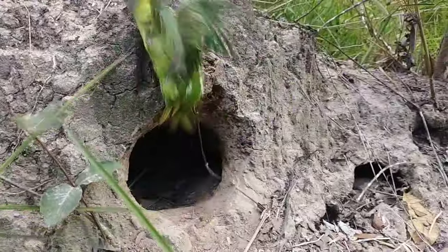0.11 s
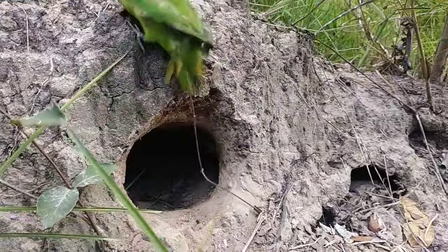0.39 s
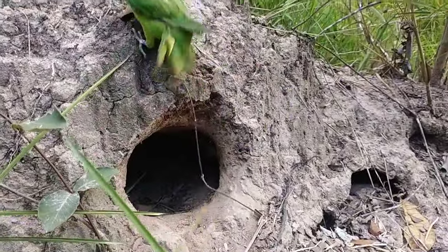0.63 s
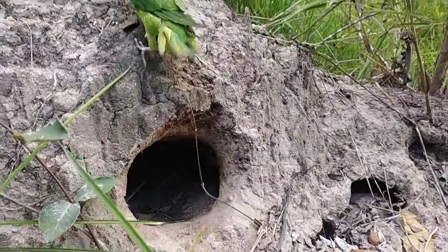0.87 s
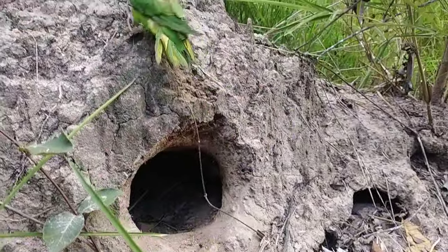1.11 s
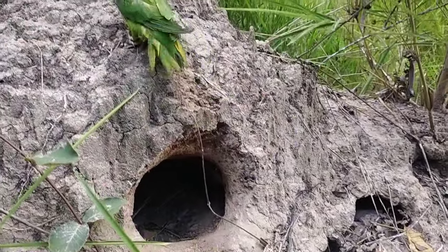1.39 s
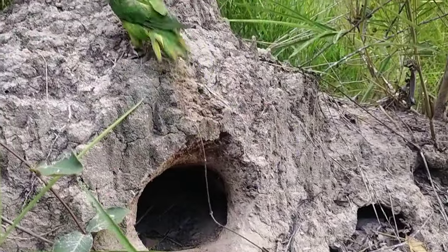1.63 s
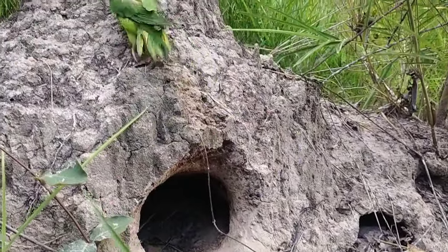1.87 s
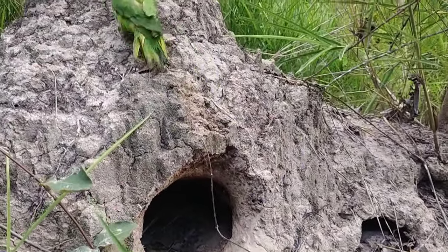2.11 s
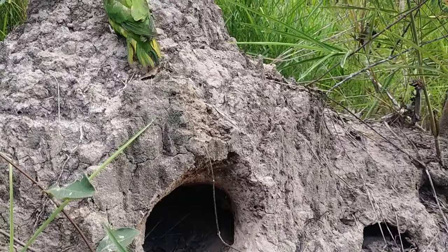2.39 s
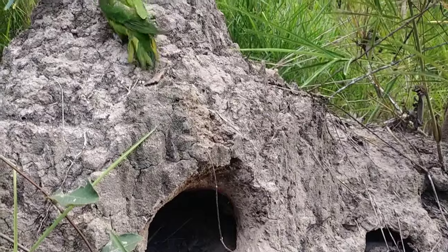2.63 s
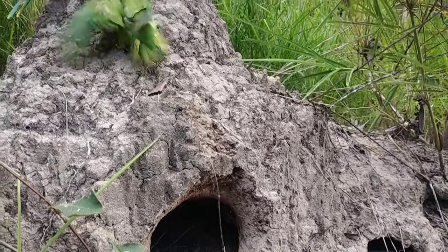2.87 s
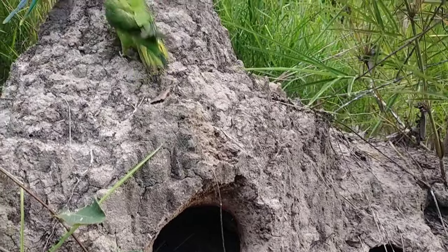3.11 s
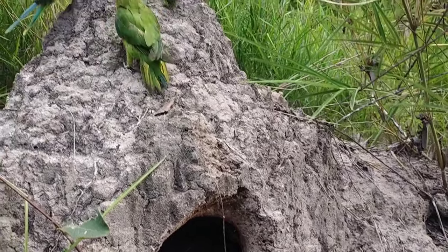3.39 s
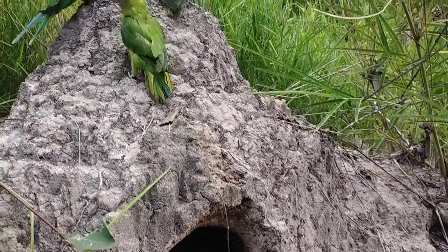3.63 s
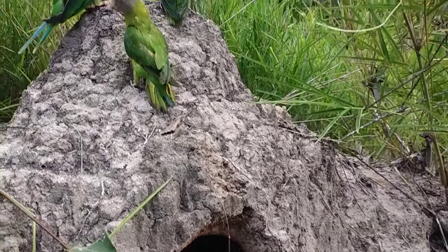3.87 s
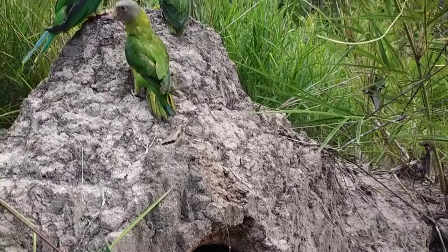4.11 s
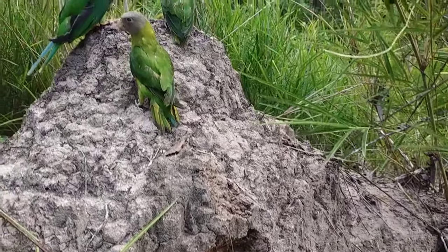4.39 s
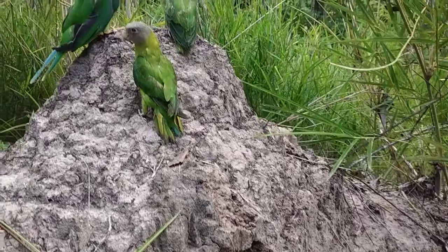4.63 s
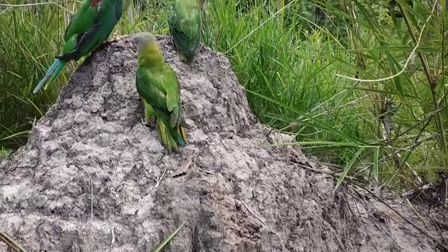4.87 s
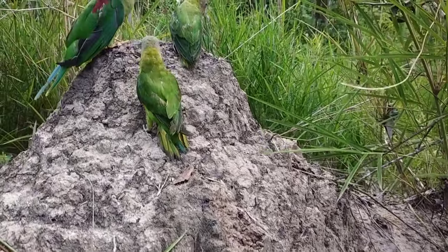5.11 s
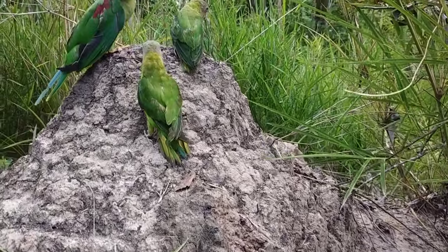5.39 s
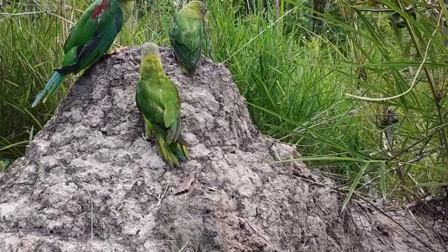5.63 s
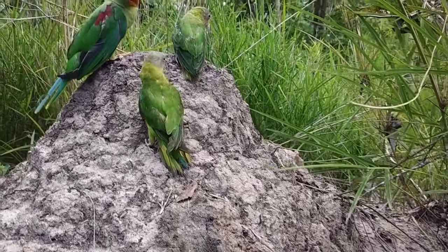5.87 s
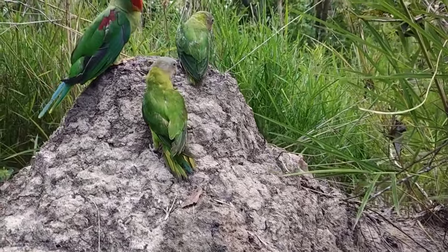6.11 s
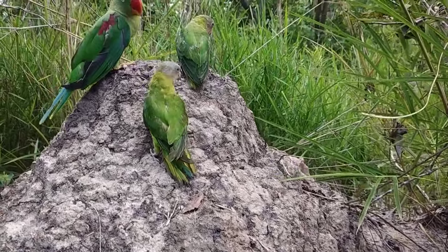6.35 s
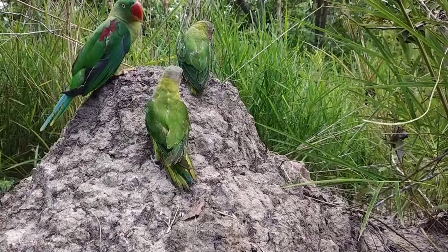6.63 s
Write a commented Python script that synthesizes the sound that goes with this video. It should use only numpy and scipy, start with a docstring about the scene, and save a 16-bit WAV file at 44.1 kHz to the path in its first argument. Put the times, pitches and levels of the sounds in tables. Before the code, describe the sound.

Outdoors, close to a phone microphone, a dense flurry of wing claps bursts out from 0 to 0.3 seconds: hard, feathery slaps with bright hiss and low puffs of air. Rustling grit lingers. From about 0.65 to 2 seconds claws tick and scrape on dry crust, with a strong hollow knock near 1.33 and lesser ones near 1.7. A distant dove coos softly at 1.0 and 1.2, then rolls in a quickening, falling throb from 1.5, with a faint coo at 2.2. Light ticks continue until a smaller, crisp flutter at 3.55 to 3.8. Afterwards only sparse faint scratches remain over low hum, hiss, crickets chirping four or five times a second and a thin high whine. Tiny abrupt dropouts interrupt the sound, mostly from 2.7 to 5.5. The dove coos again around 5.8 and 6.0, and another throbbing roll begins near 6.35, running to the end.

```python
"""Parrots on an earth mound

Small parrots flap up an earth mound and scrabble over its dry crust, close to a phone: short bursts
ring damped resonances, amid rustling grains and low wing air. A dove, a gliding near sine, coos
further off; crickets, noise pulses through a wing resonance, chirp and whine over a low outdoor hum
of filtered noise. Now and then the whole sound cuts out for an instant."""
import sys
import numpy as np
from scipy import signal
from scipy.fft import rfft, irfft
from scipy.io import wavfile
from scipy.ndimage import uniform_filter1d

SR = 44100
rng = np.random.default_rng(int(sys.argv[2]) if len(sys.argv) > 2 else 0)


def natural_amplitude(level_db):
    """Convert a level in decibels to a linear amplitude factor, elementwise."""
    exponent = np.asarray(level_db, float) / 20
    return 10 ** exponent


def pcm_store(signal):
    """Save signal as 16-bit PCM."""
    levels = np.round(np.clip(np.atleast_2d(signal), -1, 1) * 32767)
    wavfile.write(sys.argv[1], SR, levels.astype(np.int16).T)


N = 297234

# wing claps: (time [s], thump peak [dB], feather swish peak [dB], top hiss peak [dB], thump pitch [Hz])
WING_CLAPS = [(.001, -25.5, -28, -28, 1220), (.031, -20.5, -21, -24, 865), (.066, -20, -21.5, -17, 1940),
              (.072, -18, -26, -16, 1260), (0.113, -7, -10.5, -10, 1130), (.138, -34, -26, -38, 1900),
              (.149, -8.5, -17.5, -14, 970), (.153, -16, -18.5, -13, 1900), (0.181, -28.5, -41, -45, 480),
              (.194, -33, -28, -24, 1860), (.234, -37, -44, -31, 3400), (.252, -13.5, -7.5, -11.5, 2680),
              (.264, -26, -18, -32, 1960), (0.279, -34, -31, -42, 1990), (0.289, -17.5, -20.5, -33, 2190),
              (3.557, -49, -45, -42, 1610), (3.594, -41, -35, -42, 2800), (3.605, -33, -29, -27, 2870),
              (3.6221, -25, -22, -31, 540), (3.625, -21, -23, -12.5, 3160), (3.639, -29.5, -35, -34, 560),
              (3.644, -41, -27, -26, 1490), (3.66, -33, -47, -34, 3160), (3.682, -56, -38, -28, 2670),
              (3.688, -53, -39, -26, 1840), (3.697, -52, -37, -32, 3100), (3.712, -40, -42, -38, 2470),
              (3.735, -45, -39, -40, 2350), (3.771, -38.5, -42, -31, 2520), (3.787, -38.5, -41, -36, 637)]
# claws, beak and tail on the crust: (time [s], thump peak [dB], swish peak [dB], top hiss peak [dB],
# thump pitch [Hz])
CRUST_BLOWS = [(.6532, -37, -47, -42, 1190), (.8937, -30.5, -45, -54, 1180), (.952, -44, -39.5, -36, 2120),
               (1.1173, -30, -40, -36, 1590), (1.13, -53, -50, -28, 1680), (1.1702, -32, -47, -51, 1610),
               (1.255, -21.5, -36, -43, 1600), (1.271, -23.5, -48, -51, 1400), (1.284, -25, -55, -52, 1670),
               (1.2914, -37, -51, -46, 1850), (1.3273, -6.5, -32, -49, 1480),
               (1.3708, -35.5, -54, -52, 1450), (1.5008, -36, -30.5, -31, 1690),
               (1.5144, -38, -32, -45, 1870), (1.544, -36, -36, -36, 1880), (1.5652, -41, -27, -40, 2150),
               (1.5804, -53, -26.5, -42, 2940), (1.5934, -56, -54, -35, 1710),
               (1.6871, -17, -30, -24, 1570), (1.7203, -34, -58, -37, 2480),
               (1.7666, -16.5, -35, -29, 2070), (1.8467, -35.5, -33, -32, 1300),
               (1.8502, -33.5, -30.5, -42, 2320), (1.9547, -47, -41, -27, 3200),
               (1.992, -56, -55, -36, 2740), (2.5182, -31.5, -44, -42, 2280),
               (2.7884, -41.5, -61, -59, 1750), (2.843, -42, -60, -58, 1800), (2.8865, -39, -42, -57, 1390),
               (2.8956, -39, -57, -57, 2030), (2.9342, -42, -61, -55, 1890), (2.9582, -41, -61, -55, 2190),
               (2.9906, -43, -61, -52, 2070), (3.246, -58, -42, -42, 3040), (3.4945, -42, -49, -51, 2280),
               (3.864, -45, -63.5, -40, 2510), (4.2095, -44, -60, -52, 1580), (4.2204, -52, -54, -47, 2270),
               (4.288, -44, -49, -38, 2060), (4.3301, -43, -45, -38, 3150), (4.5434, -51, -52, -35, 1510),
               (4.5511, -46, -53, -32, 1280), (4.578, -38.5, -44, -39, 2500), (6.4434, -43, -61, -56, 1720)]


def evened(x):
    """Normalisation by energy: scales a signal to rms 1."""
    return x / np.sqrt(np.mean(x ** 2) + 1e-20)


def curve(rows, column=1):
    """Linear interpolation: one column of a table at every sample."""
    rows = np.array(rows)
    return np.interp(np.arange(N) / SR, rows[:, 0], rows[:, column])


def shape(x, points):
    """Linear filtering: multiplies the spectrum by a (frequency [Hz], gain [dB]) curve."""
    hz, db = np.transpose(points)
    f = np.fft.rfftfreq(len(x), 1 / SR)
    gain_db = np.interp(np.log(f + 1), np.log(hz), db)
    return irfft(rfft(x) * natural_amplitude(gain_db), len(x))


def coloured(x, points):
    """Spectral colouring: filters a signal and brings it to rms 1."""
    return evened(shape(x, points))


def resonate(x, hz, width):
    """Damped resonance: a pole pair whose radius sets the bandwidth [Hz]."""
    r = np.exp(-np.pi * width / SR)
    return signal.lfilter([1, 0, -1], [1, -2 * r * np.cos(2 * np.pi * hz / SR), r * r], x)


def add(mix, s, sound):
    """Superposition: adds a sound to the mix at s seconds."""
    part = mix[max(round(s * SR), 0):][:len(sound)]
    part += sound[:len(part)]


def wander(seconds):
    """Random fluctuation: noise averaged over a time span, at rms 1."""
    return evened(uniform_filter1d(rng.standard_normal(N), max(round(seconds * SR), 2)))


def bed():
    """Stationary noise: outdoor hum and hiss of fixed colour whose level drifts a little."""
    # spectrum of hum and hiss: (frequency [Hz], relative level [dB])
    hum_spectrum = [(30, -35), (70, -20.5), (110, -0.5), (145, 2), (200, -6.5), (300, -13.5), (600, -21.5),
                    (1500, -26), (3400, -31.5), (4200, -31), (6000, -38.5), (9000, -40), (12000, -34.5),
                    (14500, -31), (16000, -28.5)]
    level = natural_amplitude(-47.5 + 1. * wander(0.13))
    return level * coloured(rng.standard_normal(N), hum_spectrum)


def crickets():
    """Stridulation: uneven file strokes ring a wing near 4.8 kHz; far insects blur into a whine."""
    # chirps, about 4.7 a second; a second singer falls between them from 4.5 s:
    # (middle [s], level [dB], length [s])
    chirp_rows = [(0.106, -57, .073), (.337, -60, 0.07), (.523, -51, .048), (.763, -60, .067),
                  (.94, -60, 0.11), (1.012, -59, .064), (1.23, -57, 0.088), (1.42, -57, 0.1),
                  (1.62, -57, 0.12), (1.828, -53, .085), (2.022, -57, .11), (2.23, -54, 0.071),
                  (2.45, -52.5, .056), (2.678, -50.5, .078), (2.885, -56.5, .08), (3.108, -52.5, 0.069),
                  (3.297, -49, 0.046), (3.505, -51, 0.057), (3.712, -56, .14), (3.93, -52.5, 0.071),
                  (4.148, -54.5, 0.059), (4.324, -54, 0.074), (4.495, -61, 0.11), (4.554, -55.5, .057),
                  (4.65, -56.5, 0.053), (4.733, -60, 0.067), (4.826, -56, .047), (4.955, -57, .043),
                  (5.036, -53.5, 0.041), (5.15, -54.5, .043), (5.229, -52, .028), (5.398, -55.5, 0.049),
                  (5.575, -51, .047), (5.79, -56.5, 0.12), (5.929, -57, .033), (6.02, -59, 0.074),
                  (6.21, -56.5, 0.11), (6.435, -55, .1), (6.658, -54, 0.077)]
    # wing resonance: (frequency [Hz], gain [dB])
    wing_spectrum = [(4000, -27), (4450, -4.5), (4750, 6), (5050, 2), (5300, -12.5), (5900, -22)]
    # steady far insects: (frequency [Hz], bandwidth [Hz], level [dB])
    whine_rows = [(7720, 170, -69), (8040, 86, -65)]
    t = np.arange(N) / SR
    swell = np.full(N, natural_amplitude(-62.5))  # far chirps merge under the near ones
    for s, db, length in chirp_rows:
        swell += natural_amplitude(db) * np.exp(-abs((t - s) / (0.51 * length)) ** 3)
    struck = rng.random(N) < 5000 / SR  # 5000 strokes a second on average
    strokes = rng.standard_normal(N) * natural_amplitude(1.8 * wander(0.0026)) * struck
    out = swell * coloured(strokes, wing_spectrum)
    for hz, width, db in whine_rows:
        whine = resonate(resonate(rng.standard_normal(N), hz, width), hz, 3 * width)
        out += natural_amplitude(db + 3.1 * wander(0.046)) * evened(whine)
    return out


def held_coos():
    """Frequency modulation: near-sine notes arch in pitch, swell, drop in loudness and fade."""
    # held coos: (start [s], length [s], level while held [dB], top pitch [Hz],
    # place of the loudness drop [share of length])
    coo_rows = [(0.966, 0.047, -54, 707, 0.57), (1.165, 0.21, -39.5, 828.5, 0.64),
                (2.174, 0.16, -51, 698, 0.68), (5.798, 0.037, -51.5, 716, 0.7),
                (5.991, 0.22, -38, 835, 0.59)]
    longest_rise_s, swell_to = 0.0702, 0.23  # swell_to is a share of the length
    out = np.zeros(N)
    for s, length, db, top_hz, drop_at in coo_rows:
        u = np.linspace(0, 1, round(length * SR))
        top_at = min(longest_rise_s / length, .5)
        bend = 0.153 * np.maximum(1 - u / top_at, 0) ** 2
        bend += 0.207 * np.maximum((u - top_at) / (1 - top_at), 0) ** 1.58
        hz = top_hz * (1 - bend * (length / .22) ** 1.34)  # shorter coos bend less
        db = db - 17.5 * np.maximum(1 - u / swell_to, 0) ** 0.99
        db = db - 8 * np.clip((u - drop_at) / .1 + .5, 0, 1)
        db = db - 11 * np.maximum((u - drop_at) / (1 - drop_at), 0) ** 2
        tone = np.sqrt(2) * np.sin(2 * np.pi * np.cumsum(hz) / SR)
        add(out, s, natural_amplitude(db) * tone * signal.windows.tukey(len(u), .1))
    return out


def throbs(s, db, hz, gap):
    """Pulse train: rows (middle [s], level [dB], pitch [Hz], length [s]) of one quickening roll."""
    # two last notes: (time after last throb [s], level against roll [dB], pitch [Hz], length [s])
    end_notes = [(0.052, -4.5, 692, 0.1296), (.118, -12.5, 664, .09)]
    count, duty = 9, .75  # duty is the share of a gap that sounds
    gaps = gap + .027 * .55 ** np.arange(count)  # early gaps are longer
    at = s + np.cumsum(gaps) - gaps
    u = np.linspace(0, 1, count)
    rows = np.transpose([at, db - 3 * u, hz - 61 * u ** 1.4, duty * gaps])
    ending = [(at[-1] + after, db + less_db, end_hz, length)
              for after, less_db, end_hz, length in end_notes]
    return [*rows] + ending


def rolling_coos():
    """Amplitude modulation: long falling coos break into throbs with a pitch glide in each."""
    # rolls: (first throb [s], level [dB], pitch [Hz], shortest gap [s])
    roll_rows = [(1.513, -43.5, 785, .0225), (6.349, -43, 785, .021)]
    out = np.zeros(N)
    for s, db, hz, length in [row for roll in roll_rows for row in throbs(*roll)]:
        u = np.linspace(-1, 1, round(length * SR))
        # long high throbs rise, the low last notes sag
        scoop = np.clip((hz - 720) / 60., -.3, 1) * 90 * min(length / 0.033, 1) * u
        tone = np.sin(2 * np.pi * (np.cumsum(hz + scoop) / SR + rng.random()))
        add(out, s - length / 2, natural_amplitude(db) * tone * np.cos(np.pi / 2 * u) ** 0.82 * np.exp(-.4 * u))
    return out


def dove():
    """Reflection and scattering: coos return as echoes and a soft decaying tail by convolution."""
    # echoes off trees and banks: (delay [s], level [dB])
    echo_rows = [(.07, -18.5), (.12, -26), (.19, -43)]
    coos = held_coos() + rolling_coos()
    t = np.arange(SR // 2) / SR
    tail = rng.standard_normal(len(t)) * natural_amplitude(-60 * t / 0.41) * (t > .03)
    back = natural_amplitude(-12) * tail / np.linalg.norm(tail)
    for delay, db in echo_rows:
        scattered = rng.standard_normal(900) * np.hanning(900)  # many leaves and trunks
        add(back, delay, natural_amplitude(db) * scattered / np.linalg.norm(scattered))
    return coos + signal.fftconvolve(coos, back)[:N]


def downwash():
    """Turbulence: wing strokes push air, heard as low lumpy noise that decays exponentially."""
    # strokes: (time [s], level before the final tilt [dB], decay by 60 dB [s])
    stroke_rows = [(0, -32, 0.23), (0.031, -40, 0.12), (.064, -35.5, 0.14), (.112, -30, 0.067),
                   (0.147, -28, 0.11), (0.178, -34, .04), (.192, -35, .05), (.286, -40, .05),
                   (3.595, -46, .06), (3.62, -42, 0.11)]
    # colour of the air noise: (frequency [Hz], relative level [dB])
    air_spectrum = [(50, -43), (110, 6.5), (250, 4.5), (500, -2), (1000, -27)]
    level, t = np.zeros(N), np.arange(SR // 2) / SR
    onset = np.sin(np.pi / 2 * np.minimum(t / 0.0051, 1)) ** 2
    for s, db, t60 in stroke_rows:
        add(level, s, natural_amplitude(db - 60 * t / t60) * onset)
    lumps = natural_amplitude(3.5 * wander(.012))
    air = level * lumps * coloured(rng.standard_normal(N), air_spectrum)
    return shape(air, [(45, -20), (90, 1.5), (16000, 2.5)])


def stirred(column, db):
    """Energy summation: rustle level that swells before each blow and settles after it."""
    rise_s, fall_s = 0.0068, 0.011
    t, power = np.arange(-.03, .15, 1 / SR), np.zeros(N)
    bump = np.exp(np.where(t < 0, t / rise_s, -t / fall_s))
    for row in WING_CLAPS + CRUST_BLOWS:
        peak_db = db + 0.48 * (row[column] + 32.5)  # db belongs to a -32.5 dB blow
        add(power, row[0] + t[0], natural_amplitude(peak_db) ** 2 * bump)
    return np.sqrt(power)


def rustle():
    """Granular noise: dense tiny grains of feathers and grit clump; a few stand out as crackle."""
    # rustle between the blows: (time [s], treble level [dB], middle level [dB])
    rustle_rows = [(0, -46, -46), (.2, -46, -50), (.37, -47, -47), (.42, -53.5, -55.5), (.9, -53.5, -54),
                   (1.3, -52, -51), (1.48, -53, -54), (1.51, -49, -48.5), (1.62, -52, -53.5),
                   (1.78, -48.5, -51.5), (1.84, -50, -53), (1.98, -50, -54), (2.04, -60, -57.5),
                   (2.3, -58, -59.5), (2.345, -55, -54), (2.39, -58, -58), (2.52, -55, -57),
                   (2.75, -63, -63), (2.99, -58, -59.5), (3.2, -61, -62), (3.31, -53, -57),
                   (3.45, -62, -61.5), (3.53, -66, -68), (3.565, -50, -48.5), (3.66, -50, -50),
                   (3.78, -54, -58), (3.86, -61, -62.5), (4.6, -62, -59), (5.4, -67, -64.5),
                   (5.65, -60, -58.5), (6.74, -59.5, -57.5)]
    # colours of the three bands, each: (frequency [Hz], relative level [dB])
    treble_spectrum = [(7500, -25), (9000, 2.5), (11500, 0.5), (14500, 9), (16000, 3.5)]
    middle_spectrum = [(200, -9), (500, -3), (1500, 0), (3200, 0.5), (4200, -10.5), (6000, -10.5)]
    swish_spectrum = [(3800, -7.5), (5000, -3.5), (6500, 3.5), (7800, 3.5), (9000, -8), (11000, -12)]
    clumps_db = 2. * wander(0.008)
    drift_db = 2. * np.tanh(wander(0.058))
    treble_db, middle_db = curve(rustle_rows, column=1), curve(rustle_rows, column=2)
    swish_db = -58.5 + 1.31 * (middle_db + 55)  # follows the middle more steeply
    # each band: (steady level [dB], blow column, stirred level [dB], colour, grain spread [dB])
    bands = ((treble_db, 3, -55, treble_spectrum, 3.),
             (middle_db, 1, -54, middle_spectrum, 2.),
             (swish_db, 2, -55.5, swish_spectrum, 3.))
    out = np.zeros(N)
    for steady_db, column, stir_db, colour, spread_db in bands:
        level = np.hypot(natural_amplitude(steady_db + drift_db), stirred(column, stir_db))
        size = natural_amplitude(spread_db * np.minimum(rng.exponential(1, N), 5) + clumps_db)
        grains = size * rng.standard_normal(N) * (rng.random(N) < 6000 / SR)
        out += level * coloured(grains, colour)
    return out


def blows(rows, ringing, width_hz, rise_s, contact_s, grit, broad, push, swish_hz, swish_width):
    """Impact excitation: a click and crumbling puff ring a hollow thump, a swish and a top hiss."""
    out, t = np.zeros(N), np.arange(4000) / SR
    base_t60, pitch_power, strength_power = ringing
    contact = np.exp(-((t[:40] - t[20]) / contact_s) ** 2)
    for s, thump_db, swish_db, top_db, hz in rows:
        # the higher and the harder the blow, the shorter its puff
        strength = natural_amplitude(max(thump_db, swish_db, top_db) + 26.5)
        t60 = base_t60 * (1500 / hz) ** pitch_power / strength ** strength_power
        puff = rng.standard_normal(len(t)) * (1 - np.exp(-(t / rise_s) ** 2)) * natural_amplitude(-60 * t / t60)
        click = np.exp(-((t - rise_s) / contact_s) ** 2)
        strike = click + grit * np.convolve(puff, contact, "same") / (contact_s * SR)
        thump = evened(resonate(resonate(strike, hz, width_hz), hz, 3 * width_hz))
        # a higher, looser mode
        loose = resonate(resonate(strike, 1.35 * hz, 3 * width_hz), 1.3 * hz, 6 * width_hz)
        thump += broad * evened(loose)
        thump += push * evened(resonate(strike, .5 * hz, 940))  # the weight behind it
        swish = resonate(resonate(puff, swish_hz, swish_width), swish_hz, 7.9 * swish_width)
        swish = resonate(swish, swish_hz, 5300)
        snap = puff + 3.4 * np.exp(-((t - rise_s) / 1.5e-5) ** 2)
        top = resonate(resonate(snap, 15000, 3200), 14500, 7500)
        for db, part in ((thump_db, thump), (swish_db, swish), (top_db, top)):
            add(out, s, natural_amplitude(db) * part / abs(part).max())
    return out


def scrabbles():
    """Contact excitation: claws, beak and tail strike the dry crust with a longer contact."""
    # ringing: (decay by 60 dB [s], power of pitch, power of strength)
    return blows(CRUST_BLOWS, ringing=(0.023, .3, 0.21), width_hz=470, rise_s=0.00081,
                 contact_s=0.00014, grit=0.44, broad=0.46, push=0.22, swish_hz=6880, swish_width=1460)


def wing_claps():
    """Impulsive excitation: brief wing blows ring wide, strongly damped resonances."""
    # ringing: (decay by 60 dB [s], power of pitch, power of strength)
    return blows(WING_CLAPS, ringing=(0.023, 0.48, 0.16), width_hz=550, rise_s=0.001084,
                 contact_s=4e-5, grit=0.49, broad=0.55, push=0.61, swish_hz=6200, swish_width=3160)


def ground_bounce(near):
    """Early reflection: convolution with a short decaying noise burst from the ground."""
    t = np.arange(3000) / SR
    bounce = rng.standard_normal(len(t)) * natural_amplitude(-60 * t / 0.015) * (t > .002)
    return natural_amplitude(-11.0) * signal.fftconvolve(near, bounce / np.linalg.norm(bounce))[:N]


def scene():
    """Superposition: near birds with their ground bounce over the far sounds."""
    far = bed() + crickets() + dove()
    near = scrabbles() + wing_claps()
    near = near + ground_bounce(near)
    return (far + downwash() + rustle() + near)[None]


def top_cut(x):
    """Nothing passes above the cut-off."""
    return signal.sosfilt(signal.butter(12, 17020, fs=SR, output="sos"), x)


def record(dry):
    """Linear response and gating: microphone colour, then abrupt level drops of milliseconds."""
    # the microphone's notch, dip and upper edge: (frequency [Hz], gain [dB])
    mic_response = [(3600, 1), (3900, -1), (4200, -1.5), (4500, 0), (4800, -0.5), (8300, -0.5),
                    (9200, -4.5), (11500, -2), (13000, -2), (15700, 1), (15950, -27), (17000, -40)]
    # the sound cuts out: (time [s], length [ms])
    cut_rows = [(2.115, 1.7), (2.7077, 3.1), (2.7131, 5.8), (2.753, 2.1), (2.7815, 1.8), (3.032, 1.8),
                (3.1618, 12.6), (3.226, 2.4), (3.2524, 3.6), (3.256, 2.6), (3.4454, 8.4), (3.47, 1.5),
                (3.8485, 7.0), (3.8818, 1.8), (4.0086, 8.2), (4.0219, 3.0), (4.0846, 14.5), (4.1807, 5.8),
                (4.1927, 12.4), (4.2123, 3.4), (4.2445, 2.0), (4.3844, 4.4), (4.3898, 5.5), (4.4067, 3.6),
                (4.4112, 7.3), (4.4831, 4.5), (4.6776, 20.1), (4.6977, 4.7), (4.7034, 2.5), (4.8915, 9.9),
                (4.9061, 10.3), (4.9187, 4.0), (5.0683, 9.4), (5.086, 3.2), (5.1083, 7.3), (5.293, 2.0),
                (5.3291, 7.5), (5.3556, 3.7), (5.4332, 5.1), (5.4515, 2.2), (5.842, 2.2), (6.319, 7.3)]
    shut = np.zeros(N)
    for s, ms in cut_rows:
        add(shut, s, np.ones(round(ms * SR / 1000)))
    left = natural_amplitude(-24)  # what remains within a cut
    gain = 1 - (1 - left) * uniform_filter1d(np.minimum(shut, 1), size=12)
    mix = shape(dry[0], mic_response)[None] * gain
    return top_cut(mix)


dry = scene()
out = record(dry)
pcm_store(out)
```